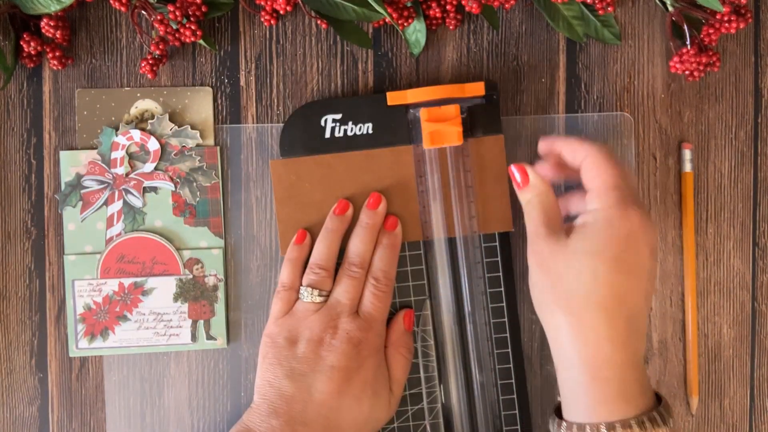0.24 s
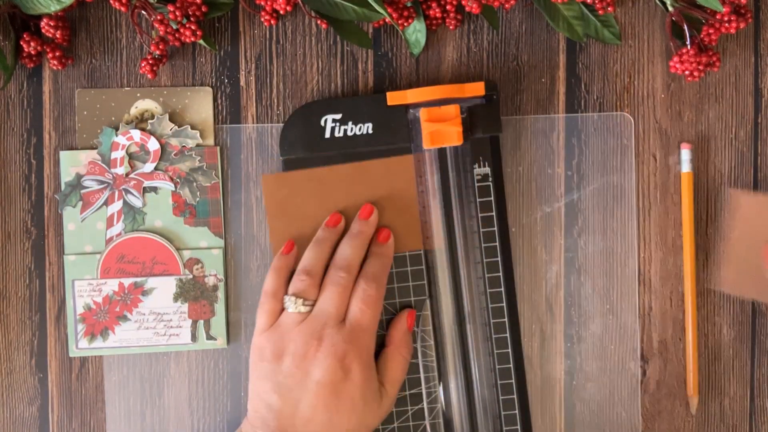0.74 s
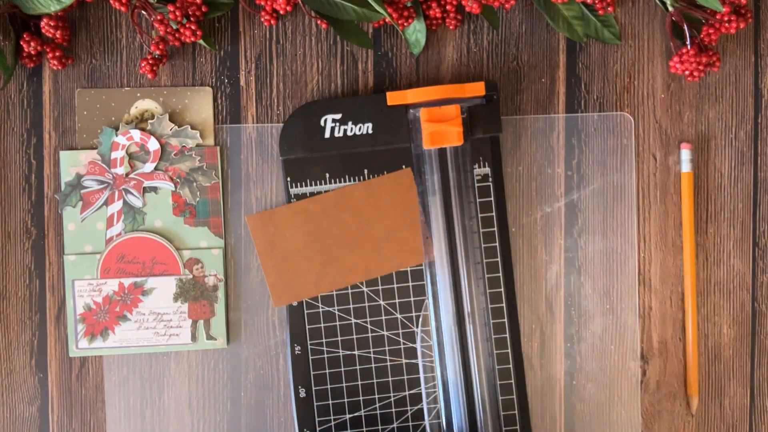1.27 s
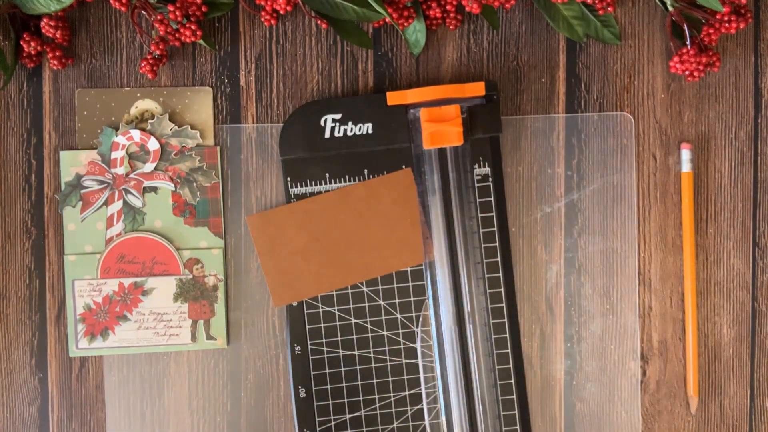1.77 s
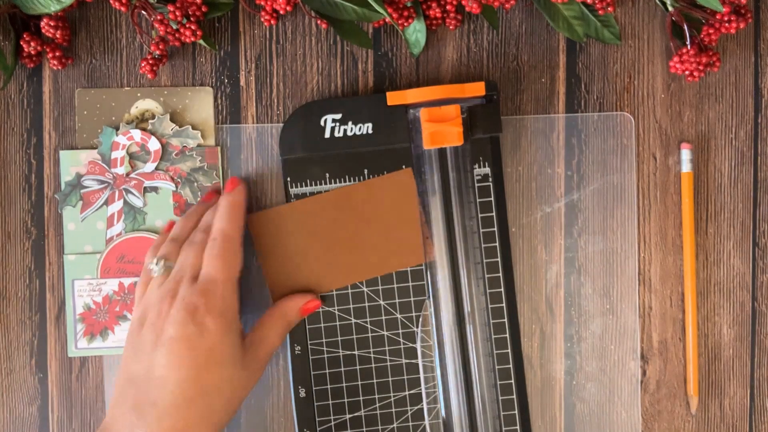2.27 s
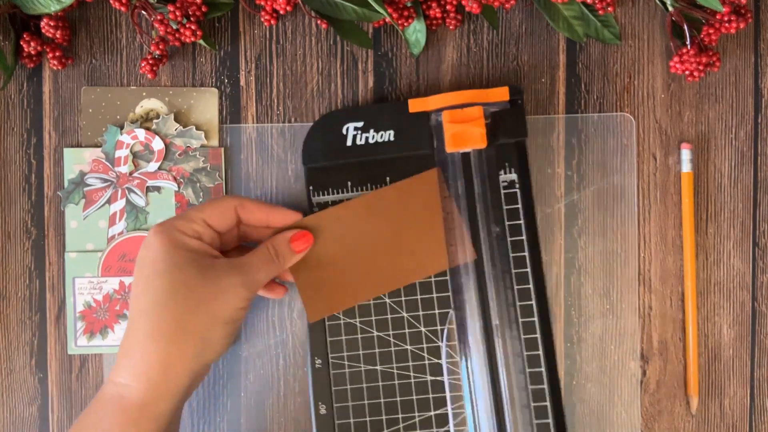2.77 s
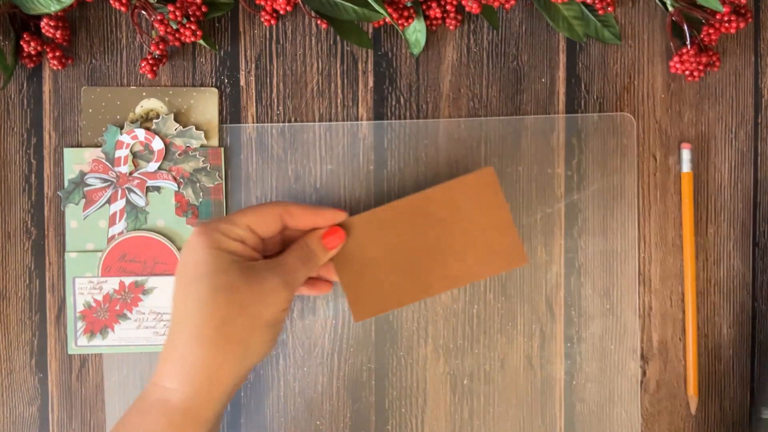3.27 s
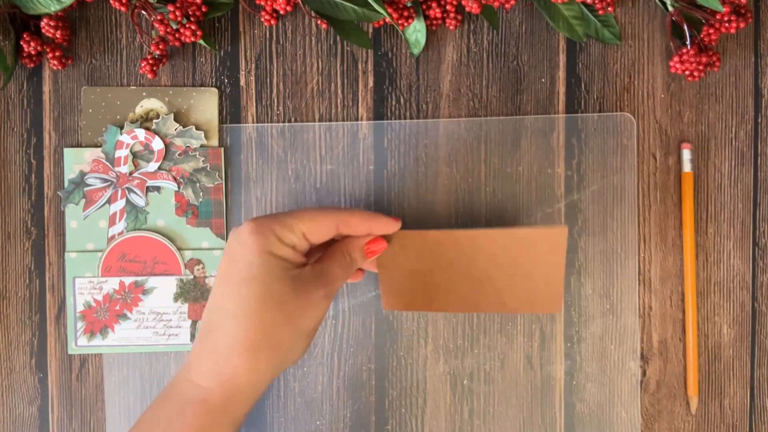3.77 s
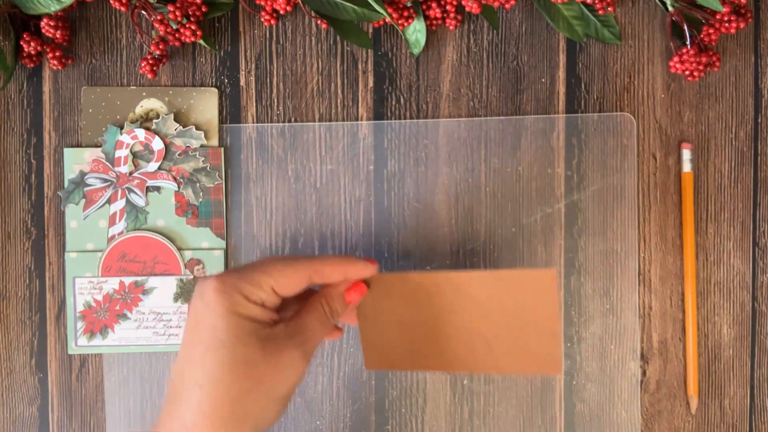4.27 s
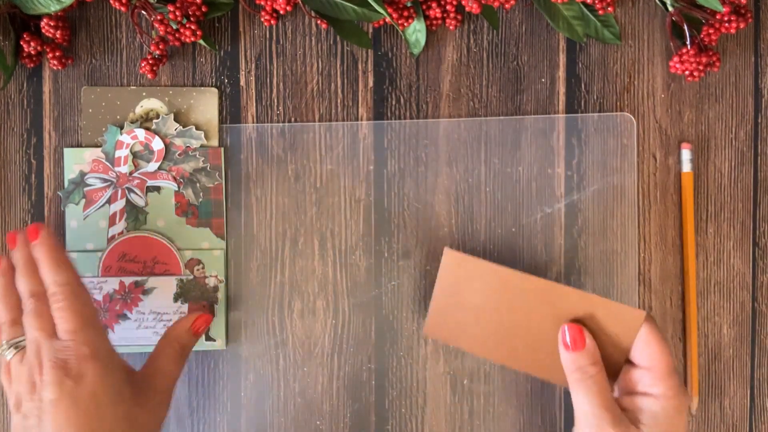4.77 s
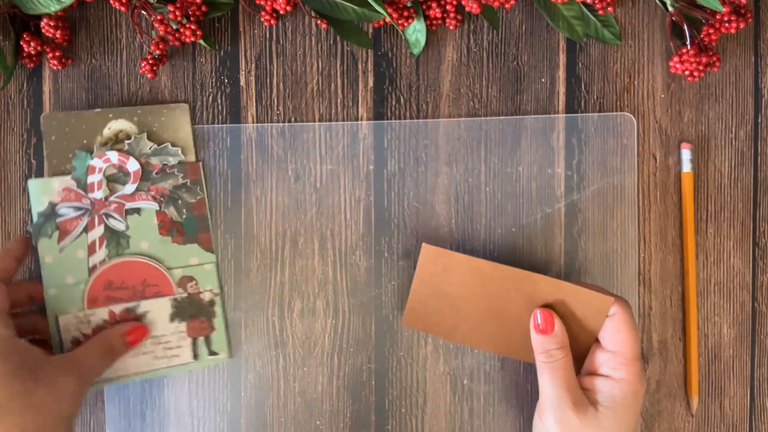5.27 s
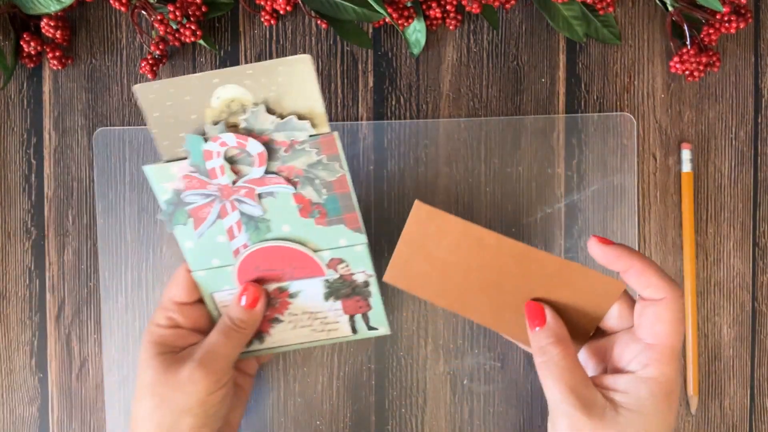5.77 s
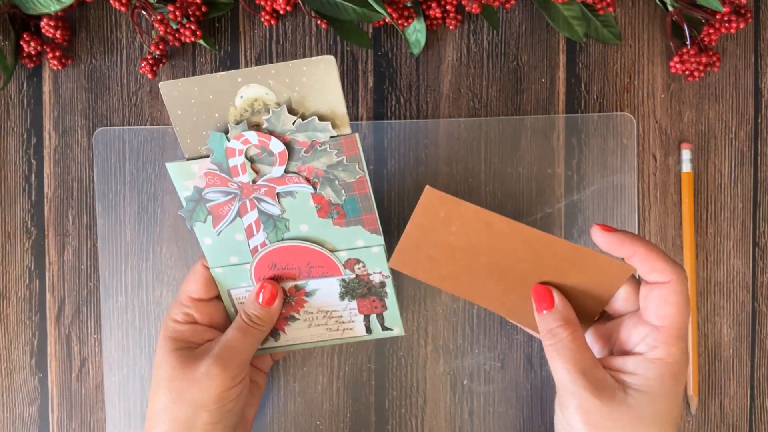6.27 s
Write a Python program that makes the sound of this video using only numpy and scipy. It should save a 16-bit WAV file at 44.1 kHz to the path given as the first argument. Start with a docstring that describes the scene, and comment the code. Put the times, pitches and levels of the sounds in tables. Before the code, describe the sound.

A close, wide stereo view of a craft table in a small room, with very low rumble and faint air. At about 0.17 s a short strong rasp meets a hard plastic clack, the loudest moment, with a smaller knock at 0.46. Around 0.6-0.7 a card edge scrapes and sings downward in pitch; dry rubs and light taps continue to 1.5. It grows sparse, with a soft scuff near 1.85 and faint finger touches around 2.35. From 2.5 to 3.0 the card scrapes off with clicks and a knock at 2.7. A quick run of tiny bright ticks skips at 3.1-3.25. A sharp plastic knock lands at 3.65, then a loose clatter at 3.97-4.07. A light hollow knock comes at 4.3 and a small tap at 4.63. Papery rubs follow, then a soft uneven drag from 5.0 to 5.85, strongest near 5.5, before near silence.

```python
"""Craft work on a table in a small room, over a low rumble and faint air made of shaped noise.
First the rail of a plastic paper trimmer clacks after a cut: noise bursts ring the plastic and table.
Then the offcut and card slide about, with taps: tiny random slips make the rub, and a card edge sings.
The card is picked off, the trimmer's foot skips over the mat in bright ticks, and it rattles down.
After a light hollow knock, a paper pocket drags over the mat. Table drones join some of the moves."""
import sys
import numpy as np
from scipy import signal
from scipy.fft import rfft, irfft
from scipy.io import wavfile
from scipy.ndimage import uniform_filter1d

SR = 44100
rng = np.random.default_rng(int(sys.argv[2]) if len(sys.argv) > 2 else 0)


def file_out(sig):
    """Save sig as 16-bit WAV at sys.argv[1]."""
    # one column per channel
    cols = np.atleast_2d(sig).T
    # limit, then scale
    lim = np.clip(cols, -1, 1)
    pcm = np.round(lim * 32767).astype(np.int16)
    wavfile.write(sys.argv[1], SR, pcm)


N = 287532
TIME = np.arange(N) / SR
FREQS = np.maximum(np.arange(N // 2 + 1) * SR / N, 1)

# Low rumble of the room. Each row: time in seconds, approximate level in dB.
RUMBLE_LEVEL = [(0, -61.5), (1.3, -69), (3.3, -66), (5.5, -62), (6.5, -70.5)]
# Tone of the rumble. Each row: pitch in Hz, relative level in dB.
RUMBLE_SPECTRUM = [(20, -21), (45, -13.5), (62, 1.5), (80, 1), (100, -8.5), (130, -17.5), (220, -36),
                   (500, -73)]
# Hands lean on the table and make it boom.
# Each row: start of full level in seconds, hold in seconds, approximate level in dB.
BUMPS = [(0.0, 0.012, -45), (0.19, 0.0055, -47), (1.913, 0.3, -60.5), (2.489, 0.0054, -49.5),
         (2.712, 0.012, -49), (3.667, .005, -51), (4.06, 0.11, -57.5)]
BUMP_ATTACK_S, BUMP_RELEASE_S = .035, .06
# Tone of the faint air. Each row: pitch in Hz, relative level in dB.
AIR_SPECTRUM = [(20, 14), (60, 22.5), (140, 19.5), (200, 10.5), (350, 16.5), (520, 6), (1000, 1.5),
                (2000, 0.5), (5000, -7), (8000, -9), (12000, -11), (16000, -12.5)]
AIR_DB = -76.5

# Short strokes of card on plastic: the cut ends, the offcut is drawn out, the card is pushed aside,
# the hand withdraws, fingers find the edge, the trimmer is moved and the hand takes hold of the pocket.
# Each row: start of full speed, attack, hold and release in seconds, then levels in dB for
# the drag of the support, the rasp of the sheet and the hiss of its fibres.
STROKES = [(0.0, .02, 0.005, 0.099, -51.5, -60, -65.5), (0.16, .022, 0.013, 0.013, -37.5, -42.5, -43.5),
           (0.372, 0.091, 0.067, .02, -82, -77.5, -71.5), (0.609, 0.06, 0.073, 0.016, -52, -42, -47),
           (0.776, 0.094, 0.07, 0.19, -56.5, -55.5, -51.5), (0.941, 0.091, 0.0082, 0.027, -54.5, -71, -60),
           (1.22, 0.12, 0.075, 0.044, -86.5, -74.5, -73.5),
           (1.356, 0.025, 0.0068, 0.096, -59.5, -49, -45.5), (1.556, .15, 0.061, 0.077, -79, -67, -64),
           (1.848, 0.037, 0.044, 0.071, -57.5, -63, -57), (2.363, 0.042, 0.044, .1, -69.5, -66, -59.5),
           (2.503, 0.018, 0.0066, 0.022, -58, -61, -82), (3.11, 0.044, .14, 0.039, -73.5, -75, -81.5),
           (3.432, .04, 0.11, .08, -84.5, -86, -80), (3.777, .15, 0.073, 0.26, -65.5, -60.5, -61),
           (3.966, 0.032, .11, 0.09, -60, -56, -65.5), (4.649, 0.028, 0.02, 0.028, -66, -58.5, -57),
           (4.744, .025, 0.055, 0.044, -76.5, -60.5, -58), (4.937, 0.033, 0.0068, .06, -72.5, -66.5, -69)]
# Two long drags: the card comes off the trimmer, and later the pocket crosses the mat.
# Each row: time in seconds, drag level in dB, rasp level in dB, hiss level in dB.
CARD_DRAG = [(2.52, -67, -70, -64.5), (2.556, -73, -56, -44), (2.652, -53, -54, -48.5),
             (2.696, -39.5, -48, -54.5), (2.718, -56, -61, -63), (2.82, -58, -61, -58),
             (2.864, -50.5, -48.5, -48), (2.942, -54, -43, -43), (2.974, -49, -62, -59),
             (2.99, -72, -73, -67)]
POCKET_DRAG = [(4.98, -91, -78.5, -73), (5.05, -69.5, -58, -59), (5.12, -75.5, -67, -69.5),
               (5.198, -82, -67.5, -69.5), (5.252, -67.5, -60.5, -59), (5.312, -83, -65.5, -56),
               (5.35, -66, -58.5, -52), (5.398, -70, -58.5, -55.5), (5.418, -57, -61.5, -59),
               (5.488, -55.5, -52, -49), (5.57, -66.5, -57.5, -57), (5.618, -69, -56.5, -53),
               (5.654, -85, -64.5, -64), (5.794, -81, -66, -59), (5.802, -69.5, -62, -61.5),
               (5.87, -86.5, -84, -90)]
DRAG_FADE_S = .015   # time to rise or fall 20 dB outside a long drag
# Tone of the shaken support, the sheet and the fibres. Each row: pitch in Hz, relative level in dB.
DRAG_SPECTRUM = [(90, -14), (170, -7.5), (280, -9.5), (450, -9), (800, -1.5), (1300, -2.5), (1900, -3.5),
                 (2700, -9), (5000, -47)]
RASP_SPECTRUM = [(900, -32.5), (1500, -4.5), (2000, 0), (2700, -2.5), (4000, -1.5), (5200, -11),
                 (6500, -8.5), (10000, -38.5)]
HISS_SPECTRUM = [(3500, -30), (5000, -4.5), (6000, -2), (7800, 1.5), (9500, -8.5), (12000, -3.5),
                 (15500, -7.5)]
# How unevenly the card grips, in dB of spread.
CLUMPING_DB, FLUTTER_DB = 2.4, 1.3
# Strength of the part of a wide sheet's sound that differs from side to side, relative to the shared rub.
OWN_RASP, OWN_HISS = .85, .55
# A card edge sings as it scrapes; two of its pitches sink ever faster as it comes free.
# Each row: start in seconds, length in seconds, first Hz, last Hz, level in dB relative to the rasp.
EDGES = [(0.605, .08, 3802, 2611, 8), (4.753, .04, 3900, 3900, 8), (5.608, .21, 3800, 3208, 4)]
EDGE_FADE_S, EDGE_SINK_POWER = .07, 2.6
EDGE_REST_HZ, EDGE_REST_DB = 3500, -13   # its faint share in all rubbing

# Knocks on the trimmer: the rail clacks, the card is picked off, one end is set down,
# then the other end rattles down. Each row: start in seconds, decay of the contact in seconds,
# level in dB, strongest pitch in Hz, fall to either side in dB per octave.
KNOCKS = [(0.003, 0.02, -47, 179, 3), (0.1685, 0.0018, -32, 1420, 2), (0.1715, 0.0053, -19.5, 1410, 8.5),
          (0.1865, 0.0094, -34, 1600, 5.5), (0.3457, 0.0024, -45.5, 8400, 7.5),
          (0.461, 0.0019, -43, 5000, 3.5), (0.4625, 0.0052, -35.5, 1270, 5.5), (0.686, .0018, -45, 2167, 3),
          (2.4714, .007, -49.5, 1310, 7.5), (2.665, .005, -42.5, 1111, 11),
          (2.6929, 0.0052, -33.5, 1690, 13), (2.7582, 0.01, -53.5, 1100, 2.5),
          (2.8558, 0.0059, -42.5, 3660, 6), (2.971, 0.011, -54.5, 250, 5),
          (3.6452, 0.002, -27.5, 2550, 13.5), (3.65, .022, -40, 694, 4.5), (3.7844, .003, -48, 2600, 8.5),
          (3.9725, 0.0036, -38.5, 1960, 6.5), (3.992, 0.0014, -48, 8400, 1.5),
          (4.0034, 0.0046, -42, 2040, 6), (4.02, .004, -43.5, 2640, 7), (4.0373, 0.0023, -39, 2950, 14),
          (4.0653, .0058, -38, 2500, 11)]
# Taps and flicks of card and fingers. Each row: start in seconds, decay of the contact in seconds,
# level in dB, strongest pitch in Hz, fall to either side in dB per octave.
TAPS = [(0.8451, 0.0019, -45.5, 7000, 3.5), (1.3305, .011, -50, 8330, 2.5),
        (1.3579, 0.0076, -44.5, 4000, 1.7), (1.4811, 0.015, -48.5, 8300, 7),
        (1.521, 0.013, -50.5, 8400, 7.5), (1.805, 0.0022, -66.5, 8400, 6.5), (2.2504, .0039, -68, 8430, 4),
        (2.3442, 0.0028, -56.5, 5200, 8), (2.54, 0.014, -47, 8400, 5), (2.5846, 0.0024, -47, 3997, 6),
        (4.621, 0.0074, -52, 1210, 1.5), (4.6325, 0.0046, -37.5, 1270, 5.5),
        (5.5873, 0.0023, -65.5, 179.4, 0), (5.706, .0015, -54, 8380, 8), (5.71, 0.0091, -62, 401, 6),
        (5.8, 0.0088, -63.5, 350, 6), (5.8946, 0.0017, -70, 8390, 16), (6.0277, .0015, -74.5, 7530, 9.5)]
# Resonances of the trimmer's plastic bed and rail.
# Each row: pitch in Hz, width in Hz (at least 45 is used), level in dB (varied a little per contact).
TRIMMER_MODES = [(649, 45, -4.5), (713, 99, -2), (995, 40, 1), (1078, 60, 4), (1230, 90, -5),
                 (1450, 120, -4), (1705, 120, -0.5), (1863, 41, -4), (2100, 41, -7.5), (2450, 14, 5),
                 (3030, 100, -5.5), (3480, 73, -2), (4020, 46, -10), (4100, 39, -15)]
# Resonances of the table top under its mat.
# Each row: pitch in Hz, width in Hz, level in dB (varied a little per contact).
TABLE_MODES = [(108, 76, 3.5), (380, 140, 1), (590, 180, 1.5), (833, 90, 0.5), (1164, 470, 0.5)]
# Registers of a contact, from thump to tick. Each row: lowest Hz, highest Hz.
REGISTERS = [(80, 320), (470, 1850), (2100, 4430), (5400, 12000)]

# Things rubbed or rocked on the table set one of its resonances droning.
# Each row: start of full level in seconds, hold in seconds, pitch in Hz, width in Hz, level in dB.
GROANS = [(1.355, 0.012, 300, 220, -55), (1.848, 0.027, 800, 110.6, -56.5), (3.11, .15, 395, 90, -70)]
GROAN_ATTACK_S, GROAN_RELEASE_S = .035, .07

# The trimmer's foot skips over the mat. Each row: start in seconds, level in dB before the added sheen.
SKIPS = [(3.094, -60.5), (3.1143, -57.5), (3.137, -59.5), (3.1557, -62.5), (3.1785, -58.5), (3.2006, -56.5),
         (3.223, -58.5), (3.2551, -61)]
SKIP_DECAY_S, SKIP_HZ, SKIP_FALL_DB_PER_OCTAVE = .0045, 9000, 3
SKIP_SHEEN_DB, SKIP_SHEEN_HZ = 3, 12080   # the hard foot adds a glassy top

# A light hollow knock on something small. Each row: start in seconds, decay of the contact in seconds,
# level in dB, strongest pitch in Hz, fall to either side in dB per octave.
HOLLOW_KNOCK = [(4.3002, .003, -50.5, 1143, 23.5)]
# Resonances of that small thing.
# Each row: pitch in Hz, width in Hz (at least 45 is used), level in dB (varied a little per contact).
HOLLOW_MODES = [(1110, 45, 7.4), (1219, 52, 12.6), (1490, 117, 6), (1836, 43, 3.2)]

# The room's decay. Each row: pitch in Hz, time to fall 60 dB in seconds.
ROOM_DECAY = [(100, .35), (500, 0.19), (1500, 0.14), (4000, 0.15), (9000, 0.024), (16000, 0.086)]
# A faint midrange echo lingers in the room.
LINGER_DB, LINGER_T60_S, LINGER_LOW_HZ, LINGER_HIGH_HZ = -21.5, 0.53, 700, 4800
# Phase between the left and right channels, which widens the sound.
# Each row: pitch in Hz, lead of the left channel in radians.
CHANNEL_PHASE = [(20, 0), (200, -.2), (600, -1.2), (1000, -1.0), (1900, -1.4), (2500, -2.2), (3400, 0),
                 (4400, .4), (6300, 1.5), (8500, 3), (9900, 3.2), (13400, 6.2), (16000, 6.3)]
# Loudness between the channels. Each row: pitch in Hz, left minus right in dB.
CHANNEL_BALANCE = [(60, 3), (200, 0.5), (400, 5), (800, 2.5), (1500, 3), (3500, 0), (7000, 0)]
CUTOFF_HZ = 16000


def from_db(db):
    """Turn decibels into gain."""
    return 10 ** (np.asarray(db) / 20)


def rms_one(x):
    """Scale to unit power."""
    return x / np.sqrt(np.mean(x ** 2) + 1e-20)


def in_time(rows):
    """Read the columns of a curve at every sample."""
    s, *columns = np.transpose(rows)
    return [np.interp(TIME, s, column) for column in columns]


def at_hz(points, hz):
    """Read a table at a pitch, on a log-frequency axis."""
    table_hz, values = np.array(points).T
    return np.interp(np.log(hz), np.log(table_hz), values)


def coloured(x, spectrum):
    """Shape the tone of x by a spectrum, then scale to unit power."""
    return rms_one(irfft(rfft(x) * from_db(at_hz(spectrum, FREQS)), N))


def drift(rate):
    """Smooth chance with up to about `rate` changes a second and a spread of 1."""
    size = N // 8   # slow changes need fewer points
    hz = np.arange(size // 2 + 1) * SR / N
    noise = rfft(rng.standard_normal(size))
    slow = rms_one(irfft(noise / (1 + (hz / rate) ** 2), size))
    return np.interp(np.arange(N) * size / N, np.arange(size), slow)


def band(x, low_hz, high_hz, order=3):
    """Keep only the sound between two pitches."""
    limits = [low_hz, min(high_hz, .45 * SR)]
    sos = signal.butter(order, limits, "band", fs=SR, output="sos")
    return signal.sosfilt(sos, x + 1e-18)


def swell(s, attack_s, hold_s, release_s):
    """Gain that rises 20 dB per attack time, holds from s on, and falls 20 dB per release time."""
    before = (s - TIME) / max(attack_s, .002)
    after = (TIME - s - hold_s) / max(release_s, .002)
    return from_db(-20 * np.clip(np.maximum(before, after), 0, 10))


def background():
    """Low noise, nearly alike on both sides, swells when the table is bumped; faint air lies over it."""
    rumble_db, = in_time(RUMBLE_LEVEL)
    bump_power = 0
    for s, hold_s, db in BUMPS:
        bump = from_db(db) * swell(s, BUMP_ATTACK_S, hold_s, BUMP_RELEASE_S)
        bump_power = bump_power + bump ** 2
    rumble = coloured(rng.standard_normal(N) + 0.049 * rng.standard_normal((2, N)), RUMBLE_SPECTRUM)
    # even out the noise's own ups and downs
    rumble /= np.sqrt(uniform_filter1d(rumble[0] ** 2, SR // 8) + 0.012)
    air_noise = turned_phase(rng.standard_normal(N)) + 2.6 * rng.standard_normal((2, N))
    air = coloured(air_noise, AIR_SPECTRUM)
    return np.sqrt(from_db(rumble_db) ** 2 + bump_power) * rumble + from_db(AIR_DB) * air


def sliding():
    """Tiny slips shake the support, the sheet and its fibres; the grip is unsteady."""
    drag_gain, rasp_gain, hiss_gain = rubbing_gains()
    edge_hz, edge_gain = edge_song()
    rub = slips(per_s=1800, spread_db=3.2, smooth_db=-1.5)
    # the coarse slips that reach the support come in clumps
    scuffs = slips(per_s=600, spread_db=2.5, smooth_db=0) * from_db(CLUMPING_DB * drift(40))
    support = ringing(wide(scuffs, own=1.0), TRIMMER_MODES + TABLE_MODES, plain_db=6.0)
    drag = coloured(support, DRAG_SPECTRUM)
    sheet = coloured(wide(rub, OWN_RASP), RASP_SPECTRUM)
    edge = edge_gain * rubbed_resonance(edge_hz, width_hz=850)
    rasp = (sheet + edge) / np.sqrt(1 + edge_gain ** 2)   # the edge takes its share of the rasp's power
    hiss = coloured(wide(rub, OWN_HISS), HISS_SPECTRUM)
    grip = from_db(FLUTTER_DB * drift(41))
    return grip * wandering(drag_gain * drag + rasp_gain * rasp + hiss_gain * hiss, patchy_db=2.5)


def rubbing_gains():
    """Drag, rasp and hiss gains of all strokes and long drags; their powers add."""
    power = 0
    for s, attack_s, hold_s, release_s, *levels_db in STROKES:
        shape = swell(s, attack_s, hold_s, release_s)
        power = power + np.outer(from_db(levels_db) ** 2, shape ** 2)
    for drag in (CARD_DRAG, POCKET_DRAG):
        start, end = drag[0][0], drag[-1][0]
        shape = swell(start, DRAG_FADE_S, end - start, DRAG_FADE_S)
        power = power + (from_db(in_time(drag)) * shape) ** 2
    return np.sqrt(power)


def edge_song():
    """Pitch and strength of the singing edge; stronger scrapes pull the pitch more."""
    strength = from_db(EDGE_REST_DB)
    weighted_hz = strength * EDGE_REST_HZ
    for s, length_s, first_hz, last_hz, db in EDGES:
        gain = from_db(db) * swell(s, EDGE_FADE_S, length_s, EDGE_FADE_S)
        freed = np.clip((TIME - s) / length_s, 0, 1) ** EDGE_SINK_POWER
        strength = strength + gain
        weighted_hz = weighted_hz + gain * (first_hz + (last_hz - first_hz) * freed)
    return weighted_hz / strength, strength


def slips(per_s, spread_db, smooth_db):
    """Fibres catch and let go: random clicks of uneven size over a smooth rub."""
    caught = np.flatnonzero(rng.random(N) < per_s / SR)
    sizes_db = spread_db * np.minimum(rng.exponential(1, len(caught)), 4)
    clicks = np.zeros(N)
    clicks[caught] = from_db(sizes_db) * rng.choice([-1, 1], len(caught))
    return rms_one(clicks) + from_db(smooth_db) * rng.standard_normal(N)


def wide(x, own):
    """A whole sheet radiates, so each side also gets a part of its own that follows the same slips."""
    strength = np.sqrt(np.abs(uniform_filter1d(x ** 2, size=24)))
    return x + own * strength * rng.standard_normal((2, N))


def ringing(x, modes, plain_db):
    """A well-damped body rings at several pitches side by side; some of the contact is heard plain."""
    out = from_db(plain_db) * x
    for hz, width, db in modes:
        r = np.exp(-np.pi * max(width, 45) / SR)   # a wider resonance dies sooner
        poles = [1, -2 * r * np.cos(2 * np.pi * hz / SR), r * r]
        ring = (1 - r * r) / 2 * signal.lfilter([1, 0, -1], poles, x + 1e-18)
        out = out + from_db(db) * ring
    return out


def rubbed_resonance(centre_hz, width_hz):
    """Friction keeps a broad resonance going; its centre may glide."""
    turn = 2 * np.pi * np.cumsum(centre_hz) / SR
    return rms_one(drift(width_hz) * np.cos(turn) + drift(width_hz) * np.sin(turn))


def wandering(x, patchy_db, count=9, order=5):
    """As the card moves and bends, narrow parts of its spectrum swell and fade."""
    _, _, frames = signal.stft(x, nperseg=512)
    patches = rng.standard_normal(frames.shape[1:])
    patches = uniform_filter1d(patches, count, axis=1)   # smooth in time
    patches = uniform_filter1d(patches, order, axis=0)   # smooth in pitch
    gains = rms_one(from_db(patchy_db * rms_one(patches)))
    return signal.istft(frames * gains)[1][:, :N]


def contacts(rows, modes, crack, own, plain_db=-6, rise_s=.0008):
    """A crack and a dying chatter ring a body; its level falls away from the strongest pitch."""
    out, t = np.zeros((2, N + SR)), TIME[:SR // 8]
    for s, decay, peak_db, peak_hz, fall_db in rows:
        at = int(s * SR)
        pressure = np.exp(-t / max(decay, 1e-4)) * (1 - np.exp(-t / rise_s))
        chatter = rng.standard_normal(len(t)) + own * rng.standard_normal((2, len(t)))
        force = pressure * chatter
        force[:, 0] += crack
        # every spot that is struck favours other modes
        struck = [(hz, width, db + 0.6 * rng.standard_normal()) for hz, width, db in modes]
        body = ringing(force, struck, plain_db)
        for low_hz, high_hz in REGISTERS:
            octaves_away = abs(np.log2(np.sqrt(low_hz * high_hz) / peak_hz))
            gain = from_db(peak_db - fall_db * octaves_away)
            sound = band(body, low_hz, high_hz)
            # the level counts the energy as if spread over 10 ms
            out[:, at:at + len(t)] += gain * sound / np.sqrt(np.sum(sound ** 2) * 50 / SR)
    return out[:, :N]


def trimmer_knocks():
    """Hard contacts ring the plastic trimmer, which passes only bass to the table."""
    return contacts(KNOCKS, TRIMMER_MODES + TABLE_MODES[:2], crack=3.0, own=0.6)


def card_taps():
    """Card and fingers tap and flick, ringing the table top."""
    return contacts(TAPS, TABLE_MODES, crack=2.5, own=0.85)


def groans():
    """Friction makes rough drones in the table under a moving thing."""
    out = 0
    for s, hold_s, hz, width_hz, db in GROANS:
        gain = from_db(db) * swell(s, GROAN_ATTACK_S, hold_s, GROAN_RELEASE_S)
        out = out + gain * rubbed_resonance(np.full(N, hz), width_hz)
    return out


def skipping():
    """The trimmer's foot sticks and slips in a quick run of bright ticks."""
    rows = [(s, SKIP_DECAY_S, db, SKIP_HZ, SKIP_FALL_DB_PER_OCTAVE) for s, db in SKIPS]
    ticks = contacts(rows, TABLE_MODES, crack=2.36, own=0.82)
    return ticks + from_db(SKIP_SHEEN_DB) * band(ticks, SKIP_SHEEN_HZ, 18000, order=2)


def hollow_knock():
    """A light contact rings the few resonances of something small and hollow."""
    return contacts(HOLLOW_KNOCK, HOLLOW_MODES, crack=1.5, own=0.44)


def turned_phase(x):
    """Turn the phase between left and right by an amount that depends on pitch."""
    half = np.exp(.5j * at_hz(CHANNEL_PHASE, FREQS))
    return irfft(rfft(x) * np.array([half, 1 / half]), N)


def room(x, late_db):
    """The direct sound, then a short tail with a decay time for each pitch, and a faint longer one."""
    t = TIME[:SR // 2]
    edges, late = np.geomspace(60, 18000, 9), 0
    for low_hz, high_hz in zip(edges, edges[1:]):
        t60 = at_hz(ROOM_DECAY, np.sqrt(low_hz * high_hz))
        echoes = band(rng.standard_normal((2, len(t))), low_hz, high_hz, order=2)
        late = late + echoes * from_db(-60 * t / t60)
    late = late * np.minimum(t / .006, 1) / np.sqrt(.02 * SR)   # the tail builds up over 6 ms
    linger = band(rng.standard_normal((2, len(t))), LINGER_LOW_HZ, LINGER_HIGH_HZ, order=2)
    linger = rms_one(linger * from_db(-60 * t / LINGER_T60_S)) / np.sqrt(len(t))
    tail = from_db(late_db) * late + from_db(LINGER_DB) * linger
    return turned_phase(x) + signal.fftconvolve(x, tail, axes=1)[:, :N]


def scene():
    """All handling sounds in the room, over the background."""
    handling = sliding() + trimmer_knocks() + card_taps() + groans() + skipping() + hollow_knock()
    return background() + room(handling, late_db=-7.0)


def record(dry):
    """Make the bass alike on both sides, favour the low mids on the left and cut the top."""
    spectrum = rfft(dry)
    alike = 1 / (1 + (FREQS / 140) ** 2)   # near 1 in the bass, near 0 above
    spectrum = (1 - alike) * spectrum + alike * spectrum.mean(axis=0)
    balance_db = at_hz(CHANNEL_BALANCE, FREQS) * np.array([[.5], [-.5]])
    balanced = irfft(spectrum * from_db(balance_db), N)
    return signal.sosfilt(signal.ellip(10, .1, 80, CUTOFF_HZ, fs=SR, output="sos"), balanced)


dry = scene()
out = record(dry)
file_out(out)
```